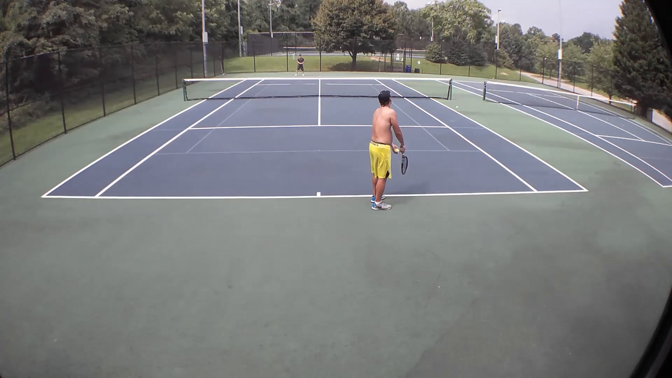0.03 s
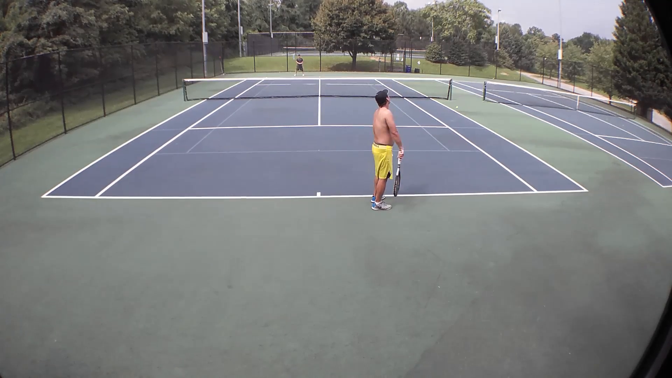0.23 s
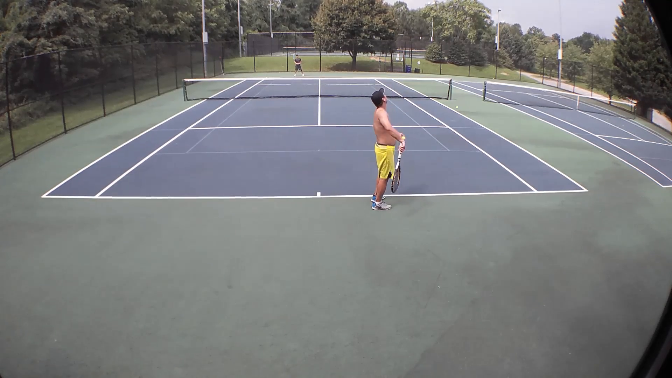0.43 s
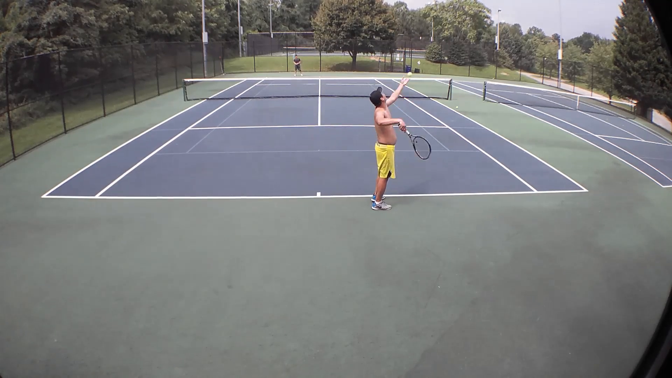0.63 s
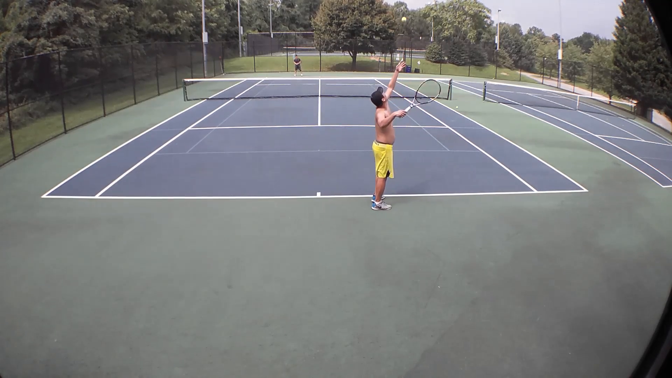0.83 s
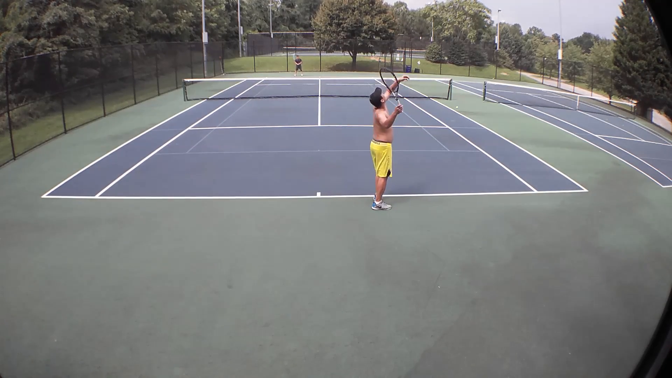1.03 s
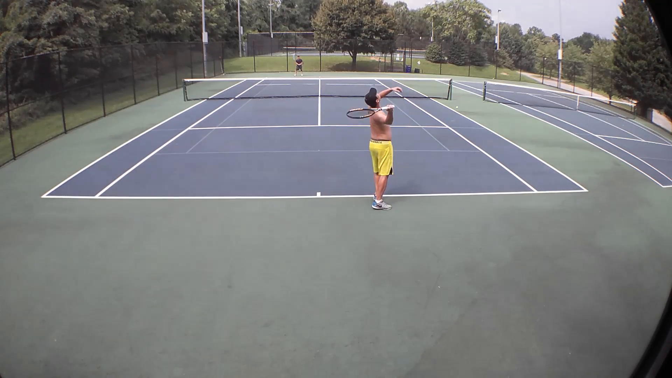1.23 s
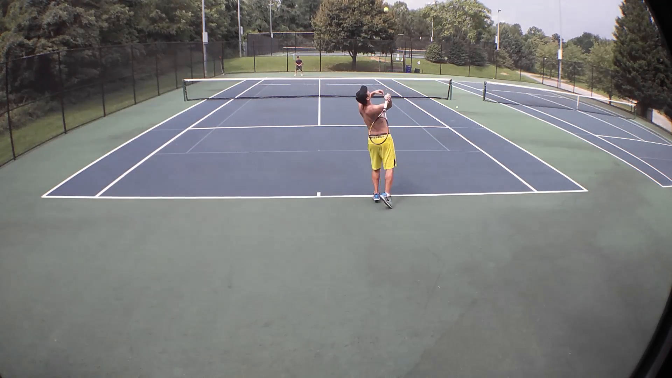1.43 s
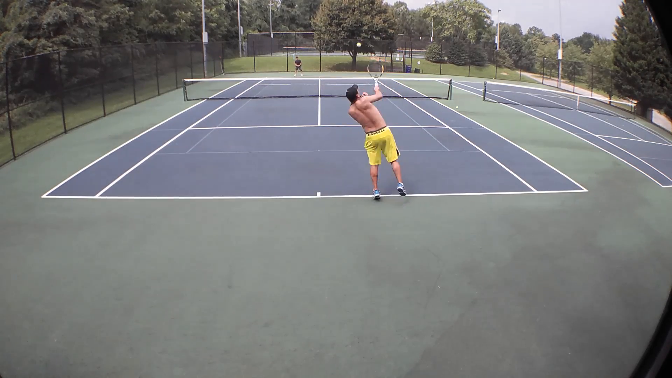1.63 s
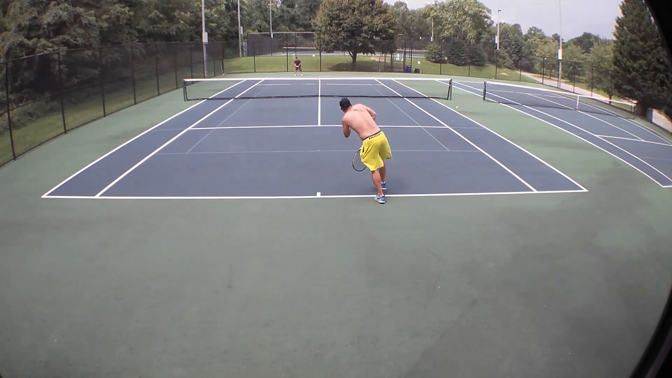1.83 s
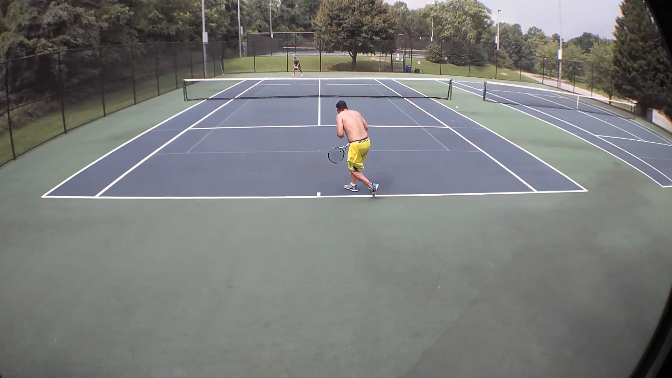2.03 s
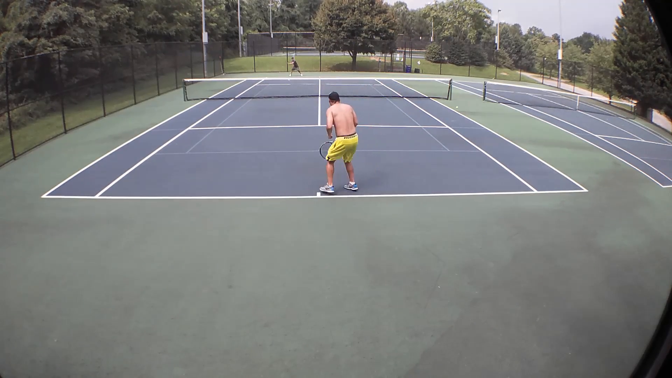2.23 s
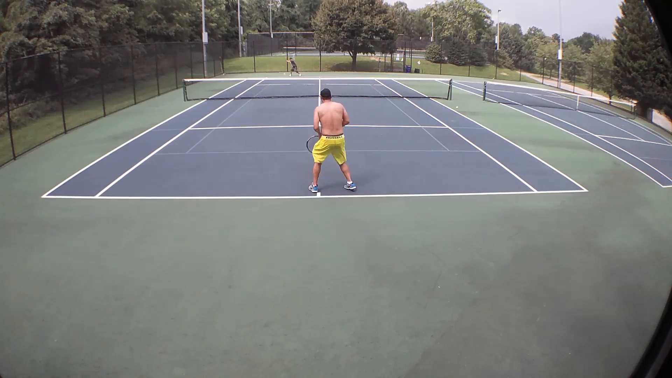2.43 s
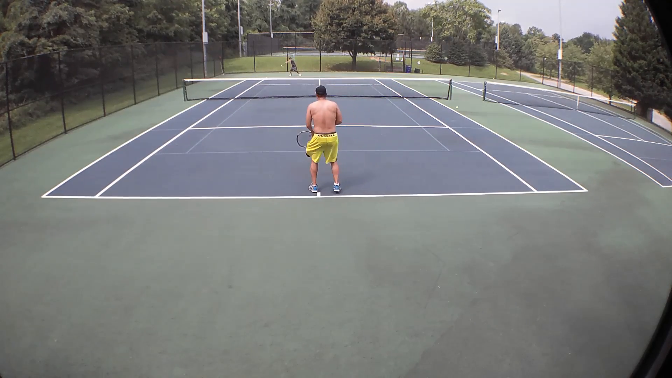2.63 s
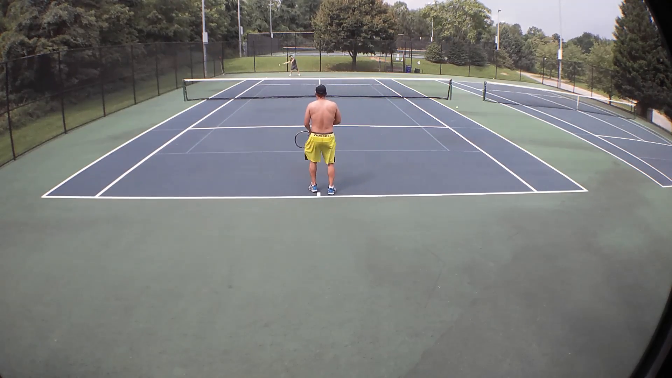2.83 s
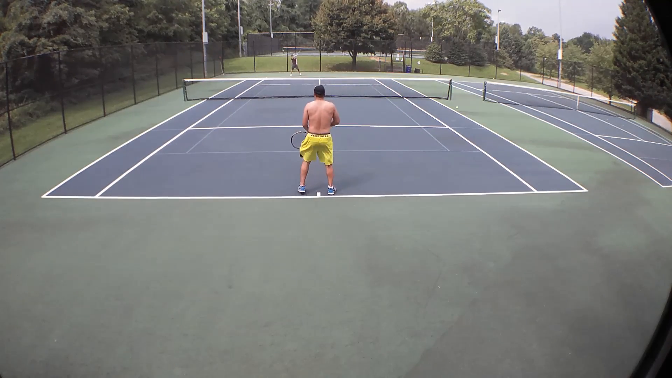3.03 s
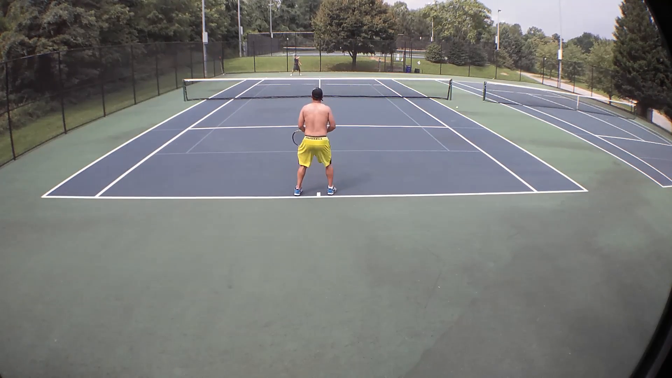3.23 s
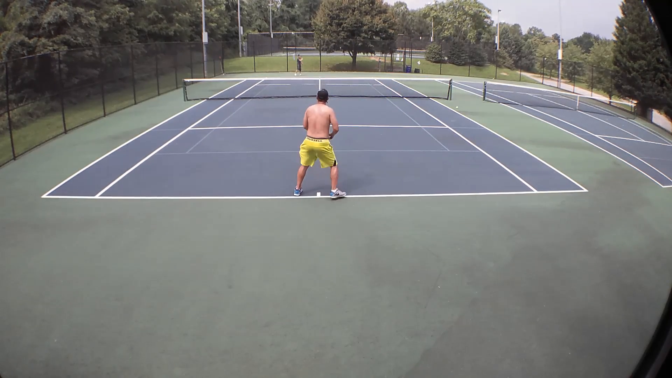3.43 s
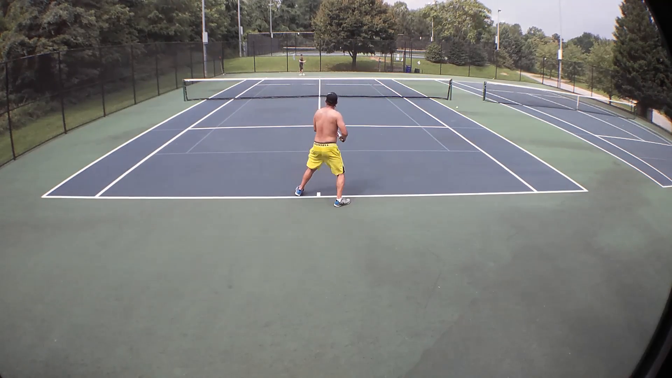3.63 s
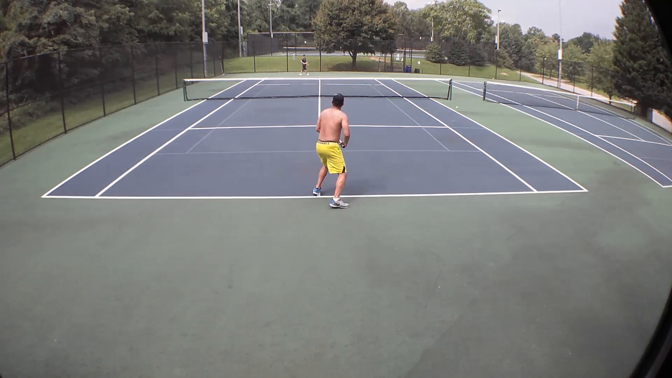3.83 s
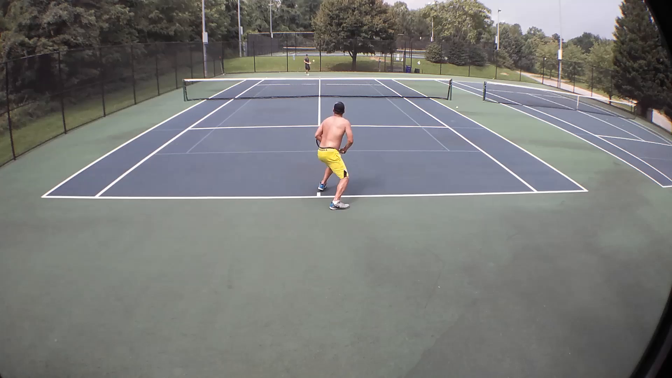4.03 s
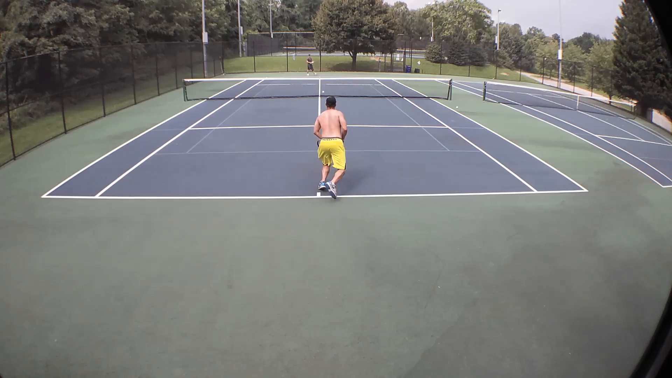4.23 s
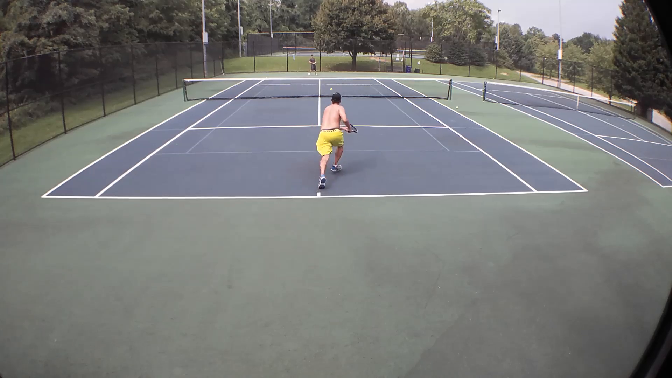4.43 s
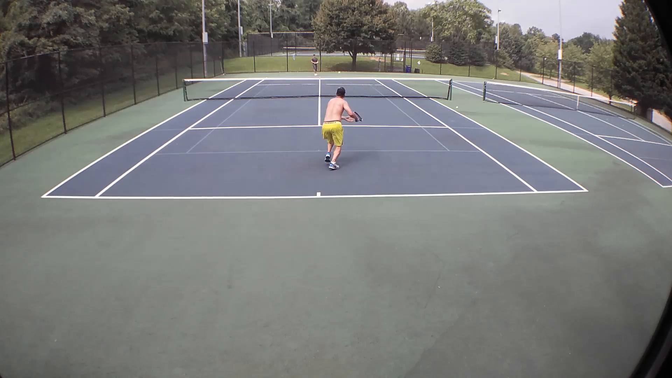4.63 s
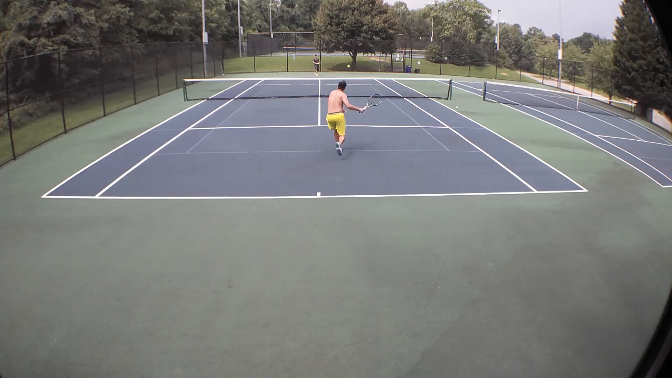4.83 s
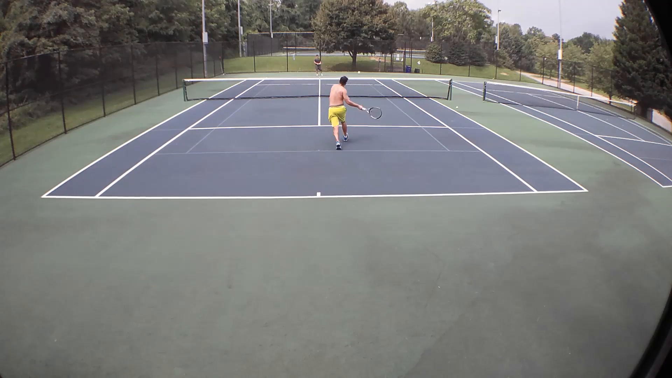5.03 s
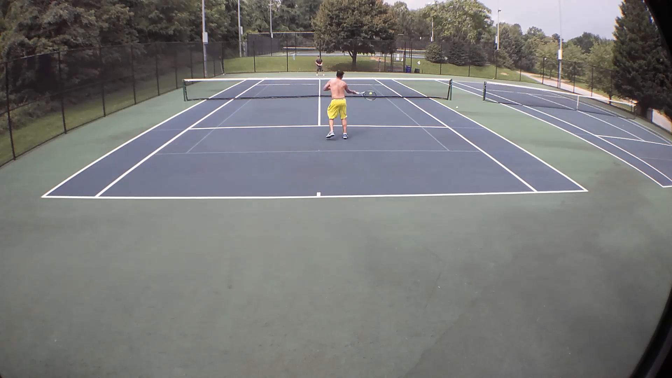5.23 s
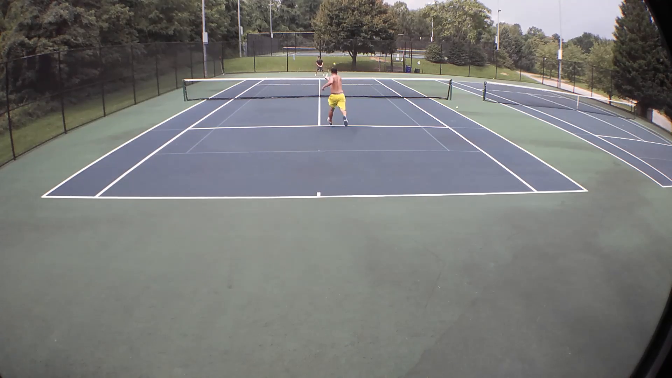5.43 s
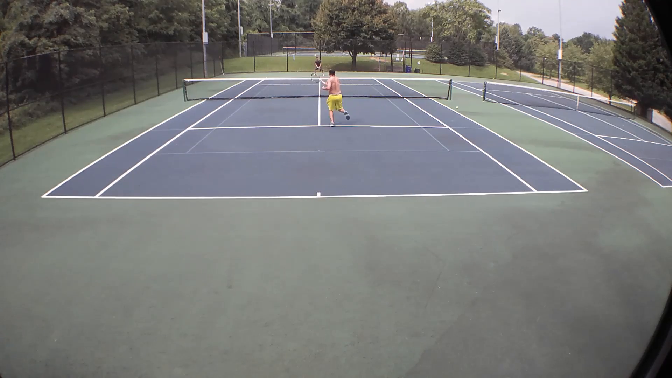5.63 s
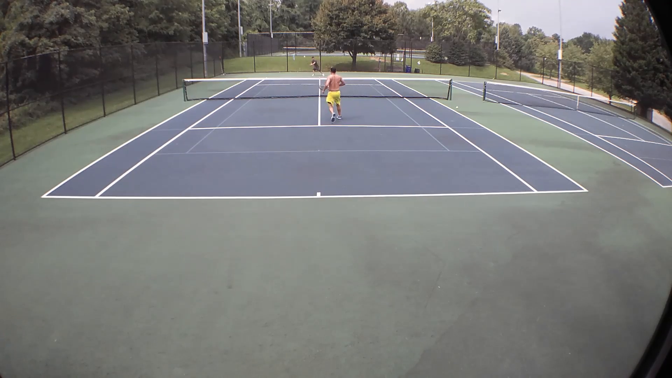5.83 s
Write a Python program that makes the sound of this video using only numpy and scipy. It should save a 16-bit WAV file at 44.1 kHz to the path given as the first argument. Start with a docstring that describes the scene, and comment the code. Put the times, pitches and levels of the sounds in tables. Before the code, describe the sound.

A stereo microphone pair behind the player picks up a short tennis rally: a sharp, thumping serve, a thinner pop from across the net, then a forehand. Between them the ball bounces softly, soles tap, scuff and chirp on gritty court. Dull echoes linger in the open air under constant high hiss, low distant rumble and faint hum.

```python
"""First you hear a high hiss, a low distant rumble, a faint hum and a light breeze that eases off.
Then comes a tennis rally on a hard court, heard from behind the baseline: serve, far return, forehand.
Strokes and ball bounces are short bursts of noise plus fading tones; fences and trees send the pops back.
Shoes tap, thud, scuff and squeak: shaped noise for soles and sand, falling tones for the squeaks."""
import sys
import numpy as np
from scipy import signal
from scipy.fft import rfft, irfft, next_fast_len
from scipy.io import wavfile

SR = 44100
rng = np.random.default_rng(int(sys.argv[2]) if len(sys.argv) > 2 else 0)


def store_wav(level_fs):
    """Save 16-bit WAV to argv[1]."""
    pcm = np.round(np.clip(np.atleast_2d(level_fs), -1, 1) * 32767)
    wavfile.write(sys.argv[1], SR, pcm.T.astype(np.int16))


N = 260190
TIME = np.arange(N) / SR
AGE = np.arange(SR) / SR   # the first second of an event
BRIEF = AGE[:SR // 4]      # its first quarter second
LEFT_RIGHT = np.array([[.5], [-.5]])   # shares out a left-minus-right difference in dB


def from_db(db):
    """Turns decibels into a plain gain."""
    return 10 ** (np.asarray(db) / 20)


def at_hz(points, hz):
    """Reads a (f/Hz, value) table along a log-frequency axis."""
    points = np.array(points)
    return np.interp(np.log(np.maximum(hz, 1)), np.log(points[:, 0]), points[:, 1])


def fade(t, t60):
    """Exponential decay from t = 0 that loses 60 dB in t60 seconds."""
    return (t >= 0) * np.exp(-np.log(1000) * np.maximum(t, 0) / t60)


# how wide a sound from all around is: [f/Hz, side minus mid level/dB]
WIDTH = [(60, -39), (110, -42), (200, -29), (400, -15), (750, -8), (1300, -5), (2400, -7.5), (4400, -4.5),
         (15000, 5)]


def noise(spectrum, size, side_db=0, tilt_db=0):
    """Stereo noise of rms 1 with the given spectrum, tilted per octave; a negative side_db narrows it."""
    length = next_fast_len(size)
    hz = np.maximum(np.fft.rfftfreq(length, 1 / SR), 1)
    gain = from_db(at_hz(spectrum, hz) + tilt_db * np.log2(hz))
    random_phase = np.exp(2j * np.pi * rng.random((2, len(hz))))
    mid, side = gain * random_phase
    side = side * from_db(at_hz(WIDTH, hz) + np.minimum(side_db, 0))
    pair = irfft(np.array([mid + side, mid - side]), length)[:, :size]
    return pair / np.sqrt(np.mean(pair ** 2))


def ring(t, modes):
    """Sum of fading sines set off at t = 0, as from a struck object."""
    return sum(from_db(db) * fade(t, t60) * np.sin(2 * np.pi * hz * t) for hz, db, t60 in modes)


def puff(t, hz, spread=1.5):
    """One push and pull of air, centred on t = 0."""
    u = 2 * np.pi * hz * t
    return -np.sin(u) * np.exp(-(u / spread) ** 2 / 2)


def add(out, start_s, sound):
    """Mixes a sound into the stereo track at its time."""
    i = max(int(round(start_s * SR)), 0)
    out[:, i:i + sound.shape[-1]] += sound[..., :max(N - i, 0)]


def wander(step_s):
    """A random drift through the whole scene: straight lines between random points of mean 0, spread 1."""
    return np.interp(TIME / step_s, np.arange(SR), rng.standard_normal(SR))


def flutter(depth_db, step_s):
    """A gain that wanders at random over the first second of an event."""
    points = rng.standard_normal(len(AGE))
    return from_db(depth_db * np.interp(AGE / step_s, np.arange(len(AGE)), points))


# distant rumble, relative levels: [f/Hz, level/dB per Hz]
RUMBLE = [(20, -59), (40, -11), (60, 3), (95, -1.5), (125, -7.5), (200, -8.5), (330, -15.5), (510, -25),
          (660, -19), (800, -17.5), (1200, -31.5), (2200, -40.5), (4500, -53.5), (16000, -65)]
# high hiss, relative levels: [f/Hz, level/dB per Hz]
HISS = [(1000, -12.5), (3000, -12.5), (4200, -13.5), (5100, -11), (6300, -13), (7000, -6.5), (7650, 2.5),
        (8050, -3.5), (8500, -18.5), (9100, -27), (10200, -21.5), (13000, -27.5), (16000, -34.5)]
# far motor hum: [t/s, level/dB]
HUM_LEVEL = [(0, -57), (1.8, -59.5), (3.6, -54), (5.9, -57)]
# soft low bumps of air: [t/s, level/dB, f/Hz]
BUMPS = [(0.245, -25.5, 98), (1.091, -33.5, 95), (1.173, -29, 98)]
RUMBLE_DB, RUMBLE_WANDER_DB, RUMBLE_WANDER_S = -47, 0.03, .35


def background(hiss_db=-53.0, hum_hz=152.5, waver_hz=1.59, waver_s=.31):
    """Low noise with a hum of wavering pitch and a few ringing bumps of air, under an even high hiss."""
    low = from_db(RUMBLE_DB + RUMBLE_WANDER_DB * wander(RUMBLE_WANDER_S)) * noise(RUMBLE, N)
    pitch = hum_hz + waver_hz * wander(waver_s)
    hum = np.sqrt(2) * np.sin(2 * np.pi * np.cumsum(pitch) / SR)   # rms 1
    low += from_db(np.interp(TIME, *np.transpose(HUM_LEVEL))) * hum
    for s, db, hz in BUMPS:
        swell = np.minimum(np.abs(TIME - s) * hz, 1)   # grows over one cycle
        low += from_db(db) * swell * ring(TIME - s, [(hz, 0, .09)])
    return low + from_db(hiss_db) * noise(HISS, N)


# light breeze on the microphone ports, relative levels: [f/Hz, level/dB per Hz]
BREEZE = [(25, -35), (45, 7), (70, 5.5), (110, -13), (200, -13), (500, -26), (16000, -90)]


def breeze(left_db=-57.5, right_db=-66.0, gust_db=12.0, easing_s=1.2):
    """Moving air rumbles at each port on its own; a light gust, strongest at the start, eases off."""
    gust = from_db(gust_db * np.exp(-TIME / easing_s))
    return gust * np.array([from_db(db) * noise(BREEZE, N)[0] for db in (left_db, right_db)])


# sound scattered by fences and trees, relative levels: [f/Hz, level/dB per Hz]
SCATTER = [(120, -7), (300, -8), (560, -5.5), (850, 6.5), (1200, -2.5), (1700, -6), (2800, -11.5),
           (5000, -11.5), (7500, -24), (9000, -30), (11000, -26.5), (16000, -43)]


def scatter(db, t60):
    """The short wash of noise that the surroundings return after a small knock."""
    onset = np.minimum(BRIEF / 0.0015, 1)
    return from_db(db) * onset * fade(BRIEF, t60) * noise(SCATTER, len(BRIEF))


# serve, return, forehand: [t/s, time on the strings/s, thump level/dB, thump f/Hz,
#   crunch level/dB, crunch tilt/dB per octave, pop level/dB, pop f/Hz, pop 60 dB fade/s,
#   string level/dB, ground reflection lag/s, near scatter level/dB, fence echo level/dB before its loss]
STROKES = [(1.6506, 0.0049, -17.5, 221, -18.5, 0, -11.5, 821, 0.03, -46, 0.0048, -31, -26.5),
           (2.9805, .0034, -38, 340, -37, 2.5, -14, 743, 0.011, -61, 0.00107, -37.5, -17),
           (5.3108, .0045, -22.5, 209, -24.5, 3, -13, 790, 0.028, -40.5, 0.001264, -34.5, -37)]
# ball and frame tones; the spot struck sets their strength:
#   [f/Hz, 60 dB fade/s, serve level/dB, return level/dB, forehand level/dB]
SNAP = [(910, 0.031, -32, -37, -34), (1470, 0.028, -33, -24, -25.5), (1790, .009, -26, -36, -32),
        (2423, 0.034, -29, -27, -44), (2760, 0.0082, -30, -42, -52), (3260, 0.01, -16.5, -53, -41),
        (3630, 0.03, -25.5, -45, -19.5), (4030, 0.013, -24, -33, -42), (4870, 0.0094, -25, -30.5, -41)]
# string bed, levels relative to the stroke's string level: [f/Hz, level/dB, 60 dB fade/s]
STRINGS = [(1122, 7.5, 0.27), (1310, -16, 0.13), (1500, -10, 0.17), (1900, 11.5, 0.12), (3490, 9, 0.077),
           (4210, 6.5, 0.042), (6000, -6, .06)]
# felt crushed against the strings, relative levels: [f/Hz, level/dB per Hz]
CRUNCH = [(200, -46), (520, 5.5), (900, 2), (1600, 2.5), (2500, -2), (3700, -12), (5500, -24.5),
          (7700, -16), (8900, -25), (10500, -19.5), (16000, -41)]
# extra path of each fence echo: [detour/m]
FENCE_DETOURS_M = [7.7, 15.2, 22.3, 36.5]
ECHO_LOSS_DB_PER_M, SOUND_M_PER_S = 0.7, 343
FAR_SCATTER_DB = -41.5   # the same for every stroke


def racket_hit(k, crunch_t60):
    """The ball crunches on the strings with a thump, then springs off with a snap, a pop and a string ring."""
    (_, dwell, thump_db, thump_hz, crunch_db, tilt_db,
     pop_db, pop_hz, pop_t60, string_db, *_) = STROKES[k]
    released = BRIEF - dwell
    squash = np.minimum(5 * BRIEF / dwell, 1)   # full after a fifth of the contact
    contact = squash * fade(np.maximum(released, 0), crunch_t60)
    crushed_felt = noise(CRUNCH, len(BRIEF), side_db=-7.5, tilt_db=tilt_db)
    hit = from_db(crunch_db) * contact * crushed_felt
    hit += from_db(thump_db) * puff(BRIEF - 0.77 * dwell, thump_hz)
    snap = [(hz, levels[k], t60) for hz, t60, *levels in SNAP]
    hit -= ring(released, [(pop_hz, pop_db, pop_t60)] + snap)
    hit += from_db(string_db) * ring(released, STRINGS)
    return hit


def strokes(ground_db=-3.5, crunch_t60=0.019, near_t60=0.28, far_t60=0.65, far_build_s=0.034,
            far_tilt_db=1.5, fence_hz=700):
    """Each hit also reaches us off the ground, as fence echoes and as scattered sound."""
    out = np.zeros((2, N))
    high_pass = signal.butter(2, fence_hz, "high", fs=SR, output="sos")
    for k, (s, dwell, *_, lag, near_db, echo_db) in enumerate(STROKES):
        hit = racket_hit(k, crunch_t60)
        add(out, s, hit)
        # the hard court mirrors the stroke; the higher the contact, the later its reflection
        add(out, s + lag, from_db(ground_db) * hit)
        # a fence lets the bass through and throws back the rest
        thin = signal.sosfilt(high_pass, hit)
        for detour in FENCE_DETOURS_M:
            add(out, s + detour / SOUND_M_PER_S, from_db(echo_db - ECHO_LOSS_DB_PER_M * detour) * thin)
        # close things scatter at once on release; the far fences build up and last longer
        near = from_db(near_db) * fade(AGE - dwell, near_t60) * noise(SCATTER, len(AGE))
        far_shape = (1 - np.exp(-AGE / far_build_s)) * fade(AGE, far_t60)
        far = from_db(FAR_SCATTER_DB) * far_shape * noise(SCATTER, len(AGE), tilt_db=far_tilt_db)
        add(out, s, (near + far) * flutter(depth_db=2.0, step_s=0.00804))
    return out


# what lingers among the trees, relative levels: [f/Hz, level/dB per Hz]
LINGER = [(150, -10), (560, -9), (850, 5), (1250, -2), (1600, -15.5), (3500, -12), (5500, -16.5),
          (9000, -27), (16000, -42)]


def trees(linger_db=-48, build_s=0.03, linger_t60=1.78):
    """Every stroke returns from the trees as dull noise that builds up and fades slowly."""
    out = np.zeros((2, N))
    shape = (1 - np.exp(-AGE / build_s)) * fade(AGE, linger_t60)
    for s, *_ in STROKES:
        add(out, s, from_db(linger_db) * shape * noise(LINGER, len(AGE)))
    return out


# short hard touch on the court, relative levels: [f/Hz, level/dB per Hz]
TAP = [(300, -17), (800, 6.5), (1800, 1), (3500, -8), (5500, -6), (9000, -20), (16000, -28)]


def tap(db, t60=0.028):
    """A dry tick of fading noise where something meets the court."""
    return from_db(db) * fade(BRIEF, t60) * noise(TAP, len(BRIEF), side_db=-9)


# sand grains under a sole, relative levels: [f/Hz, level/dB per Hz]
GRIT = [(2000, -4), (5000, -4), (7600, 9), (9000, 3), (11000, 4.5), (14000, -3), (16000, -9)]


def sand(db):
    """Grains grinding under a sole make a high noise."""
    return from_db(db) * noise(GRIT, len(BRIEF))


# footfalls: [t/s, force level/dB, thud level/dB, sand level/dB]
STEPS = [(1.8081, -25.5, -26.5, -46.5), (2.093, -54, -54, -70), (2.199, -55, -53, -70),
         (3.5634, -36, -36, -47), (3.601, -46, -47, -67), (3.613, -40.5, -43, -68),
         (3.9272, -39.5, -59, -66), (4.048, -48, -48, -70), (4.527, -42, -39, -47),
         (4.539, -41.5, -30, -62), (5.583, -36, -29.5, -68)]
# air clapped out from under a sole, levels relative to the force: [f/Hz, level/dB, 60 dB fade/s]
SOLE = [(757, 1, 0.018), (1200, -3.5, 0.012), (1760, -22, 0.012), (3300, -14, 0.0045)]
THUD_HZ = 156
TAP_DB, TAP_FOLLOWS = -36.5, 0.2   # tick at 0 dB force; share of the force in dB that it follows


def steps(grit_t60=0.043, scatter_db=-21, scatter_t60=0.22):
    """A sole taps and claps down while sand crunches; the weight follows with a thud."""
    out = np.zeros((2, N))
    onset = np.minimum(BRIEF / .001, 1)
    for s, force_db, thud_db, sand_db in STEPS:
        clap = from_db(force_db) * ring(BRIEF, SOLE)
        slap = tap(TAP_DB + TAP_FOLLOWS * force_db) + clap + scatter(force_db + scatter_db, scatter_t60)
        crunch = fade(BRIEF, grit_t60) * sand(sand_db)
        thud = from_db(thud_db) * puff(BRIEF - .004, THUD_HZ)
        add(out, s, slap + onset * (crunch - thud))
    return out


# shoes sliding on the court: [t/s, rise/s, fall to 1/e/s, rasp level/dB, rasp f/Hz, sand level/dB]
SCUFFS = [(1.969, .027, .035, -57, 3400, -63), (2.62, 0.039, 0.03, -43.5, 3120, -60.5),
          (3.1004, .0014, 0.027, -44.5, 3280, -69), (3.74, 0.04, 0.076, -56.5, 3120, -56.5),
          (3.857, .0015, 0.021, -42, 3580, -50.5), (4.185, 0.023, 0.025, -50, 4250, -48.5),
          (4.456, 0.02, .035, -49, 4270, -52), (4.525, 0.0035, 0.0028, -41.5, 3470, -60),
          (5.131, .013, .008, -60, 4000, -48), (5.829, 0.011, 0.082, -46.5, 4050, -48.5)]
# rubber rasping, relative levels: [multiple of the rasp f, level/dB per Hz]
RASP = [(.15, -14), (.55, -13), (.8, -1.5), (1.1, -1.5), (1.35, -7.5), (1.6, -19), (3.5, -45)]
SLIP_DB, SLIP_S = 3, .0012   # unevenness and spacing of the slips
BITE_SHARP, BITE_S = 0.149, 0.0101   # the rasp starts this share higher and sinks as the sole brakes


def scuffs():
    """Rubber sticks and slips unevenly: a rasp that sinks as the sole brakes, with sand hissing too."""
    out = np.zeros((2, N))
    # reading the noise faster at first raises its pitch
    slid = BRIEF + BITE_SHARP * BITE_S * (1 - np.exp(-BRIEF / BITE_S))
    for s, rise, fall, rasp_db, rasp_hz, sand_db in SCUFFS:
        pressure = np.minimum(BRIEF / rise, 1) * np.exp(-np.maximum(BRIEF - rise, 0) / fall)
        slips = flutter(depth_db=SLIP_DB, step_s=SLIP_S)[:len(BRIEF)]
        spectrum = [(rasp_hz * ratio, db) for ratio, db in RASP]
        surface = noise(spectrum, len(BRIEF), side_db=-10.0)
        rasp = from_db(rasp_db) * np.array([np.interp(slid, BRIEF, channel) for channel in surface])
        add(out, s, pressure * slips * (rasp + sand(sand_db)))
    return out


# ball bounces: [t/s, thump level/dB, ring level/dB, felt tick level/dB]
BOUNCES = [(2.4187, -34, -39, -43), (4.3838, -23.5, -26.5, -47)]
# hollow ball on the court, levels relative to the ring: [f/Hz, level/dB, 60 dB fade/s]
BALL = [(1040, -15, 0.035), (1163, -1, 0.022), (1640, -23.5, 0.0038), (2390, -19, .008),
        (3470, -17, 0.0085)]


def bounces(thump_hz=210, thump_t60=0.02, scatter_db=-24, scatter_t60=0.33):
    """The ball ticks and rings briefly as it flattens on the court, with a low thump under it."""
    out = np.zeros((2, N))
    onset = np.minimum(BRIEF / 0.004, 1)
    for s, thump_db, ring_db, tick_db in BOUNCES:
        thump = onset * ring(BRIEF - .002, [(thump_hz, thump_db, thump_t60)])
        hollow = from_db(ring_db) * ring(BRIEF, BALL)
        wash = scatter(ring_db + scatter_db, scatter_t60)
        add(out, s, tap(tick_db) + wash - hollow - thump)
    return out


# rubber squeaking as it grips: [t/s, length/s, start f/Hz, level/dB]
SQUEAKS = [(3.1, 0.0044, 4420, -31), (3.854, 0.019, 4415, -41), (5.829, 0.0082, 4070, -39),
           (5.864, 0.019, 3560, -38.5)]
SQUEAK_SAG = 0.211   # share of its pitch that a squeak loses as the shoe slows


def squeaks(wobble_db=1.06):
    """For a moment the slipping turns regular and gives a short falling tone with a wobbly pitch."""
    out = np.zeros((2, N))
    for s, length, start_hz, db in SQUEAKS:
        progress = np.minimum(AGE / length, 1)
        wobble = flutter(depth_db=wobble_db, step_s=0.00129)   # multiplies the pitch
        pitch = start_hz * (1 - SQUEAK_SAG * progress) * wobble
        swell = np.sin(np.pi * progress) ** 2
        add(out, s, from_db(db) * swell * np.sin(2 * np.pi * np.cumsum(pitch) / SR))
    return out


def scene(background_pan_db=1.25):
    """The play is centred and the background leans a little to the left; trees and breeze join in."""
    around = from_db(background_pan_db * LEFT_RIGHT) * background()
    play = strokes() + steps() + scuffs() + bounces() + squeaks()
    return around + breeze() + play + trees()


# microphone pair: [f/Hz, left minus right level/dB]
MIC_BALANCE = [(60, -1), (250, -1), (800, 0.3), (1200, 0), (2400, 0), (3600, 1.5), (5100, 7.5), (6600, 1),
               (7700, 2.5), (10000, -3.5), (13000, -1), (16000, -3)]
CUTOFF_HZ = 15900


def record(dry, left_lag_s=.00003, notch_hz=510, notch_q=5.2, notch_db=-10, low_cut_hz=42):
    """Two microphones of different colour, the left slightly late; housing dips low mids, ends are cut."""
    length = next_fast_len(N + SR // 10)
    hz = np.fft.rfftfreq(length, 1 / SR)
    colour = from_db(at_hz(MIC_BALANCE, hz) * LEFT_RIGHT)
    delay = np.exp(-2j * np.pi * hz * left_lag_s * np.array([[1], [0]]))
    heard = irfft(rfft(dry, length) * colour * delay, length)[:, :N]
    notched = signal.lfilter(*signal.iirnotch(notch_hz, notch_q, fs=SR), heard)
    # put back some of the removed band, so the dip is only notch_db deep
    heard = notched + from_db(notch_db) * (heard - notched)
    heard = signal.sosfilt(signal.butter(4, low_cut_hz, "high", fs=SR, output="sos"), heard)
    return signal.sosfilt(signal.ellip(10, .2, 70, CUTOFF_HZ, fs=SR, output="sos"), heard)


dry = scene()
out = record(dry)
store_wav(out)
```